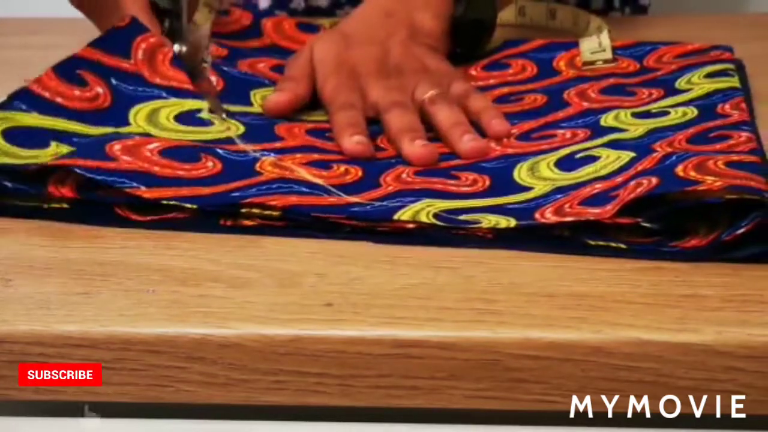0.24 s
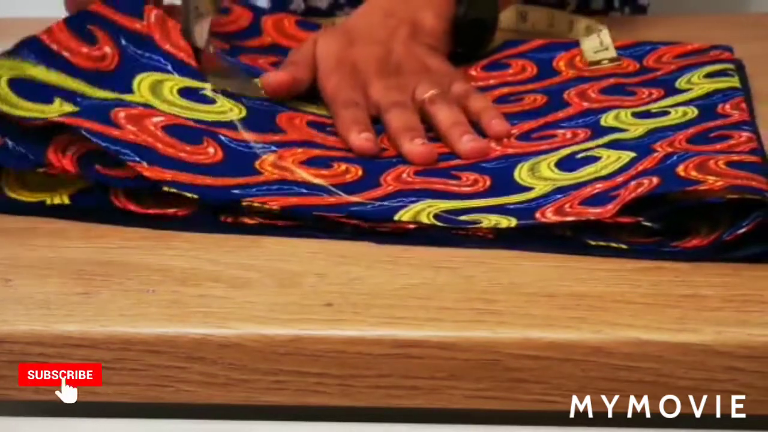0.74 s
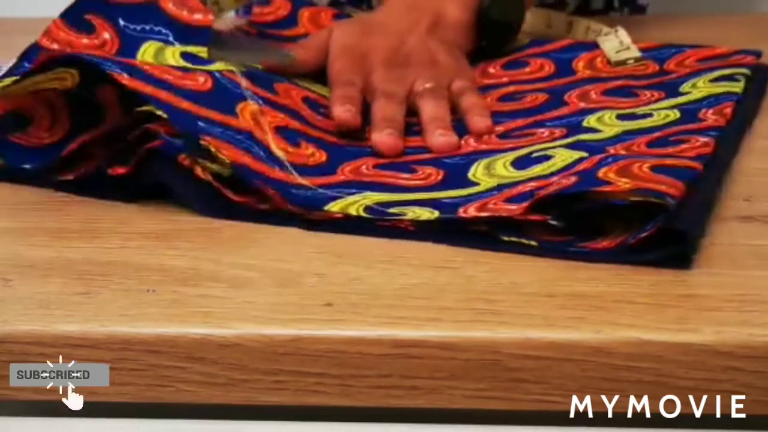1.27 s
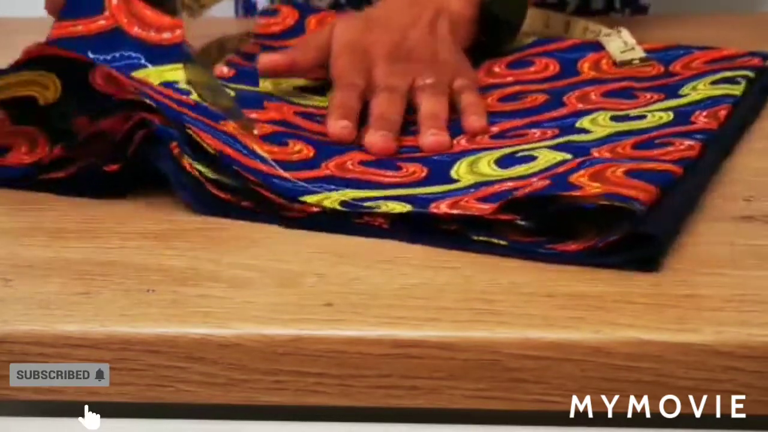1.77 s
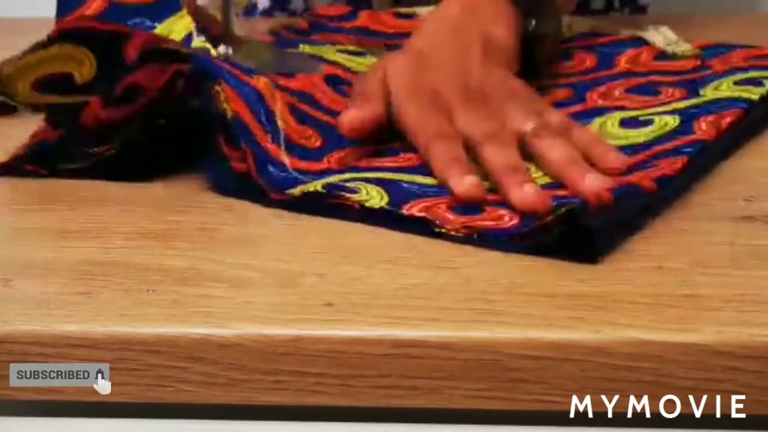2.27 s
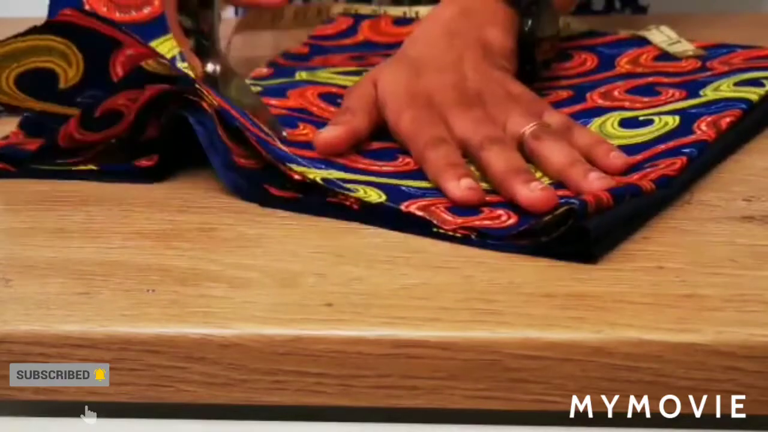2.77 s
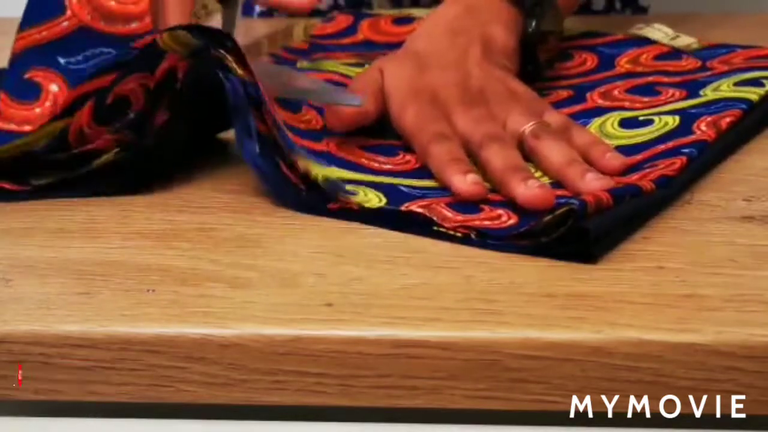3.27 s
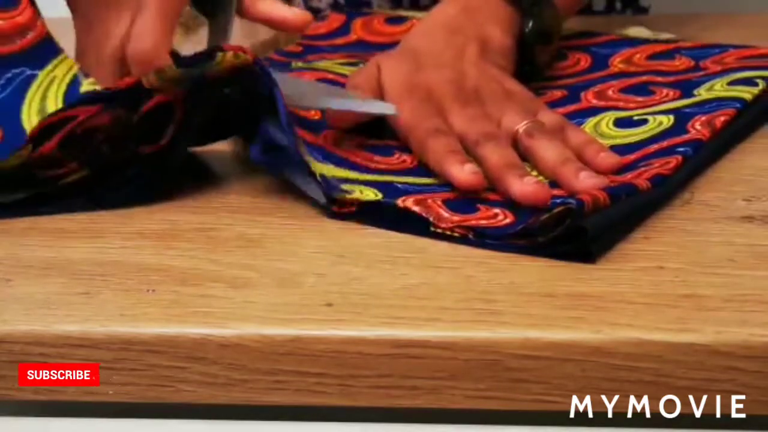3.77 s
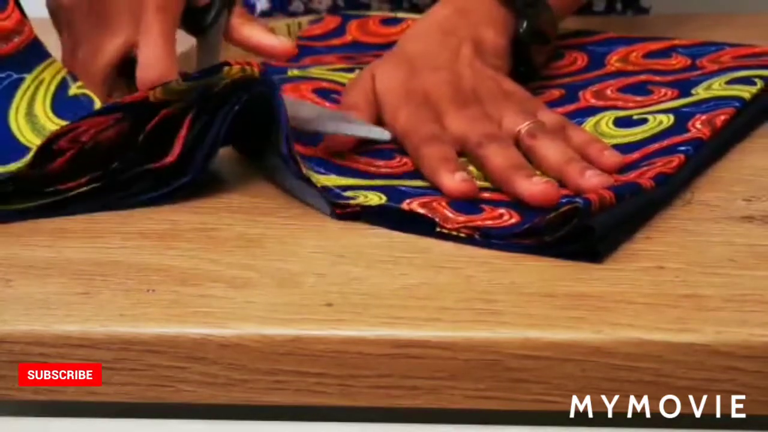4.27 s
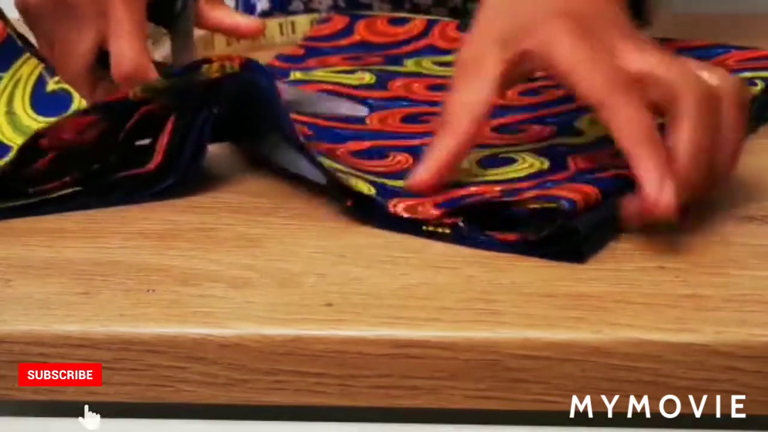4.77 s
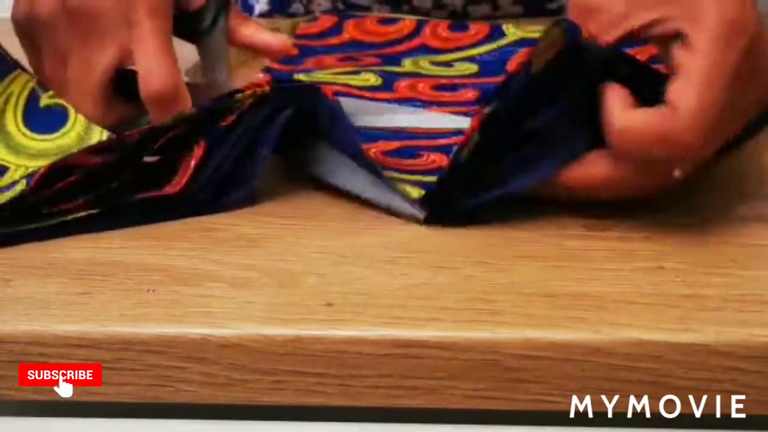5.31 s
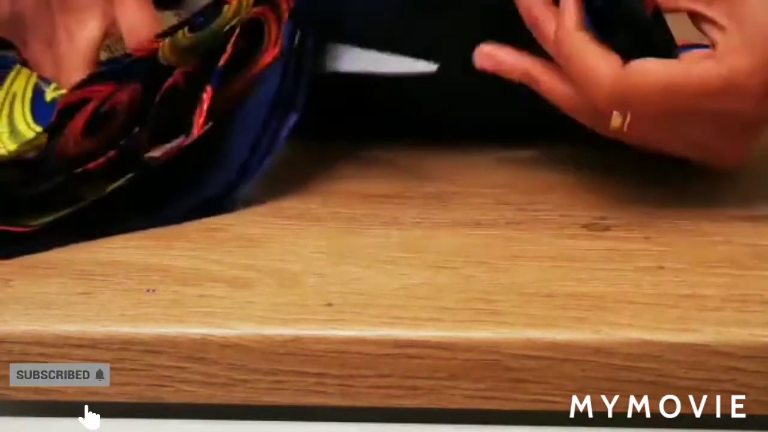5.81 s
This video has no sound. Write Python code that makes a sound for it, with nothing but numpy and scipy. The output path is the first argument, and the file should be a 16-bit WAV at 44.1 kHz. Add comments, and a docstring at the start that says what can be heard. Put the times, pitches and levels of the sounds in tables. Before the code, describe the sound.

Six crisp, gritty scissor cuts through thick fabric in a small room, blades sliding open between, ending in table bumps and cloth shoves.

```python
"""Tailor's shears make six cuts through folded cloth on a wooden table in a small room.
Quiet air, a faint table shudder and faint rubbing run throughout; a knock comes just before the first cut.
Each cut is one squeeze of the hand: snapping threads crunch through the blades and drum the table top.
Between cuts the blades slide open, squeak, click and knock on the wood, and a hand presses and shoves.
After the sixth cut come knocks, shoves, one long slide and a last press, then a short slide and a knock."""
import sys
import numpy as np
from scipy import signal
from scipy.fft import rfft, irfft
from scipy.io import wavfile

SR = 44100
rng = np.random.default_rng(int(sys.argv[2]) if len(sys.argv) > 2 else 0)


def digitize_waveform(pressure):
    """Quantize a signal to 16-bit integers and store it at the path in sys.argv[1].

    Rows of a 2-D input are taken as channels; values are limited to [-1, 1].
    """
    field = np.atleast_2d(pressure).T
    bounded = np.clip(field, -1, 1)
    quanta = np.round(bounded * 32767).astype(np.int16)
    wavfile.write(sys.argv[1], SR, quanta)


N = 266805
TIME = np.arange(N) / SR  # s
TAPS = 8192  # length of the impulse responses and of the short noise bursts, samples

# The six cuts. Each row: start in seconds, squeeze in seconds, let-go in seconds, first bite in dB
# re the hardest squeeze, then relative levels in dB of crunch, cloth rasp, deep table drumming,
# hollow table ring and table shudder, and last the blade resonance in Hz.
CUTS = [ (0.171, 0.11, 0.069, -17.5, -45, -47, -33, -34.5, -45, 1840),
        (0.915, 0.13, 0.084, -17, -45, -51.5, -44, -40, -49, 1760),
        (1.741, 0.13, 0.089, -13, -44.5, -54, -49.5, -40, -50, 1670),
        (2.819, 0.1, 0.096, -9, -47, -55, -47.5, -40, -60, 1757),
        (3.501, 0.11, 0.082, -12, -44, -57, -49, -40.5, -58, 1770),
        (4.597, 0.033, 0.07, -5, -47, -52, -43.5, -46, -48, 1820), ]
# Deep modes of the table top. Each row: frequency in Hz, width in Hz, relative level in dB.
TABLE_DEEP = [(158.8, 9.1, 1.5), (207.6, 18.7, 2), (248, 10, -35), (269.6, 39, 4), (315, 290, -12)]
# Hollow modes of the table top. Each row: frequency in Hz, width in Hz, relative level in dB.
TABLE_HOLLOW = [(390, 83, -27), (448.6, 16, -6), (461.5, 19, -2.5), (496, 32, 5), (580.6, 8.8, -8),
                (636, 9.8, -11.5)]
# Spectrum of scraped cloth. Each row: frequency in Hz, relative level in dB per Hz.
SCRAPE = [(400, -8), (800, 8.5), (1250, 5), (1800, 1.5), (2400, -4), (4500, -8), (9000, -20.5)]


def amp(db):
    """Decibels to gain."""
    return 10 ** (np.asarray(db) / 20)


def unit(x):
    """Scales a response to energy 1."""
    return x / np.sqrt(np.sum(x ** 2) + 1e-20)


def read(points, hz):
    """Reads a table on a log-frequency axis."""
    f, value = np.transpose(points)
    return np.interp(np.log(hz + 1), np.log(f + 1), value)


def add(mix, s, sound):
    """Mixes a sound in at time s."""
    part = mix[max(round(s * SR), 0):][:len(sound)]
    part += sound[:len(part)]


def through(x, response):
    """Passes a sound through an impulse response."""
    return signal.oaconvolve(x, response)[:N]


def colour(spectrum):
    """Causal (minimum-phase) impulse response with the given spectrum and energy 1."""
    hz = abs(np.fft.fftfreq(TAPS, 1 / SR))
    log_gain = np.log(amp(read(spectrum, hz)))
    return unit(np.fft.ifft(np.exp(np.conj(signal.hilbert(log_gain)))).real)


def ring(modes):
    """Impulse response of a set of modes; the wider the mode, the faster it dies."""
    t = np.arange(TAPS) / SR
    total = 0
    for hz, width, db in modes:
        total = total + amp(db) * unit(np.exp(-np.pi * width * t) * np.sin(2 * np.pi * hz * t))
    return unit(total)


def table(modes):
    """The table top answers only around its modes; the cloth cushions everything faster."""
    hz = [row[0] for row in modes]
    band = signal.butter(2, [0.94 * min(hz), 1.6 * max(hz)], "band", fs=SR, output="sos")
    return unit(signal.sosfilt(band, ring(modes)))


def wander(per_s):
    """Random motion of about unit size: straight lines between per_s random knots a second."""
    knots = rng.standard_normal(4096)
    return np.interp(TIME * per_s, np.arange(len(knots)), knots)


def grains(per_s, spread_db, clump_db, clumps_per_s):
    """Tiny snaps of uneven size that come in clumps, rms 1."""
    size = amp(spread_db * np.minimum(rng.exponential(1, N), 3)) * rng.choice([-1, 1], N)
    present = rng.random(N) < per_s / SR
    clumps = amp(clump_db * np.tanh(wander(clumps_per_s)))
    snaps = size * present * clumps
    return snaps / (snaps.std() + 1e-20)


def gate(start, end, attack_s, release_s):
    """Gain 1 from start to end, dying away exponentially on both sides."""
    outside = np.maximum(start - TIME, 0) / attack_s + np.maximum(TIME - end, 0) / release_s
    return np.exp(-np.minimum(outside, 20))


def air():
    """Quiet air of the room: steady coloured noise."""
    # Spectrum of the air. Each row: frequency in Hz, relative level in dB per Hz.
    air_spectrum = [(25, 0), (60, -1), (120, -6), (300, -12), (600, -18), (2000, -24), (2350, -16),
                    (2800, -26), (6000, -33), (11000, -37), (15700, -44)]
    return amp(-69) * through(rng.standard_normal(N), colour(air_spectrum))


def squeeze(s, squeeze_s, let_go_s, bite_db):
    """Force of one cut: the edges bite, the hand squeezes to a rounded peak and lets go."""
    bite_s = 0.01  # the edges take hold this fast
    let_go_db = -28.5  # force after the let-go time, re the hardest squeeze
    peak = s + squeeze_s
    rise = np.clip((peak - TIME) / squeeze_s, 0, 1)
    fall = np.clip((TIME - peak) / let_go_s, 0, 2)
    force_db = bite_db * rise ** 1.97 + let_go_db * fall ** 1.93  # the powers round the top
    return amp(force_db) * gate(s, peak + 2 * let_go_s, bite_s, bite_s)


def press(s):
    """The hand's weight lands quickly on the table, then the shudder dies away."""
    rise_s, fade_db_per_s = 0.0097, 137
    since = np.maximum(TIME - s, 0)
    return np.minimum(since / rise_s, 1) * amp(-fade_db_per_s * np.maximum(since - rise_s, 0))


def rumble():
    """The whole table shudders under the hands as low noise, with every cut and every press."""
    # The hand puts its weight on the table. Each row: start in seconds, relative shudder in dB.
    presses = [(0.585, -43), (1.204, -50.5), (1.55, -57), (4.05, -60.5), (4.67, -50), (5.315, -48)]
    # Spectrum of the shudder. Each row: frequency in Hz, relative level in dB per Hz.
    shudder_spectrum = [(15, 2.5), (26, -3), (38, 0.5), (57, 5.5), (80, -5.5), (110, -4.5), (160, -10),
                        (400, -54)]
    weight = amp(-66.5) * np.ones(N)  # the hands are never quite still
    for s, db in presses:
        weight += amp(db) * press(s)
    for s, squeeze_s, let_go_s, bite_db, *_, shudder_db, _ in CUTS:
        weight += amp(shudder_db) * squeeze(s, squeeze_s, let_go_s, bite_db) ** 0.4
    return amp(-0.5) * through(rng.standard_normal(N) * weight, colour(shudder_spectrum))


def slide(s, length, drift_db):
    """Speed of the opening blades: a brisk start, a steady drift in dB, a stop as the blades part."""
    attack_s, release_s = 0.015, 0.015
    drift = amp(drift_db * np.clip((TIME - s) / length, 0, 1))
    start = np.clip((TIME - s) / attack_s, 0, 1)
    return start * drift * gate(s, s + length, attack_s, release_s)


def shove(s, length):
    """Speed of a shove: one arch that swells in its middle and dies quickly at its ends."""
    ends_db, edge_s = -5.5, 0.028
    off_centre = np.clip(2 * (TIME - s) / length - 1, -1, 1)
    return amp(ends_db * off_centre ** 2) * gate(s, s + length, edge_s, edge_s)


def sliding():
    """Opening blades rub with a fine hiss; slides and shoves scrape the cloth; shoves drag on the wood."""
    # The blades slide open. Each row: start in seconds, length in seconds, relative levels of
    # steel hiss and cloth scrape in dB, change of speed by the end in dB.
    slides = [(0.496, 0.22, -69.5, -61, -2), (1.27, 0.2, -65.5, -68.5, 0), (2.304, 0.16, -59, -47, -5.5),
              (3.149, 0.19, -62, -48, -6), (3.857, 0.18, -56.5, -51, -7.5), (5.094, 0.34, -65.5, -60.5, 1),
              (5.774, 0.068, -70.5, -68, -2.5)]
    # Shears and cloth are shoved over the table. Each row: start in seconds, length in seconds,
    # relative levels of cloth scrape and table ring in dB.
    shoves = [(0.54, 0.14, -53.5, -50), (0.876, 0.073, -54, -48), (1.206, 0.084, -66, -63.5),
              (1.707, 0.062, -64.5, -55.5), (2.026, 0.14, -50.5, -50.5), (2.225, 0.085, -55.5, -50.5),
              (2.315, 0.14, -59, -48.5), (2.69, 0.065, -49, -49.5), (2.978, 0.043, -55, -58),
              (3.153, 0.058, -60.5, -57.5), (3.37, 0.046, -78, -63), (3.796, 0.1, -63, -68.5),
              (4.5, 0.19, -60, -58), (4.928, 0.26, -61.5, -57.5), (5.218, 0.17, -65, -53)]
    # Spectrum of steel rubbing on steel. Each row: frequency in Hz, relative level in dB per Hz.
    hiss_spectrum = [(1500, -16), (2800, -11.5), (4700, 2), (5800, -5), (7200, 7.5), (8000, 5), (8700, -7),
                     (10400, -0.5), (12000, -13), (15700, -18)]
    fine = grains(per_s=7600, spread_db=3.5, clump_db=4.5, clumps_per_s=86)
    coarse = grains(per_s=3100, spread_db=3.5, clump_db=7.5, clumps_per_s=34)
    hiss, scrape, drag = np.zeros((3, N))
    for s, length, hiss_db, scrape_db, drift_db in slides:
        speed = slide(s, length, drift_db)
        hiss += amp(hiss_db) * speed
        scrape += amp(scrape_db) * speed
    for s, length, scrape_db, drag_db in shoves:
        speed = shove(s, length)
        hiss += amp(scrape_db - 19) * speed  # a shove hisses faintly too
        scrape += amp(scrape_db) * speed
        drag += amp(drag_db) * speed
    # a little rubbing stays on: the hands are never quite still
    hiss = fine * (hiss + amp(-81.5))
    scrape = coarse * (scrape + amp(-76))
    steel = amp(-3.5) * through(hiss, colour(hiss_spectrum))
    cloth = amp(-9.5) * through(scrape, colour(SCRAPE))
    wood_response = amp(-2.5) * table(TABLE_HOLLOW) + amp(-8.5) * table(TABLE_DEEP)
    return steel + cloth + through(coarse * drag, wood_response)


def knocks():
    """A soft blow on the table top, then a short noisy shuffle as the shears settle."""
    # Shears and hand bump the table. Each row: start in seconds, relative levels of the deep
    # and the hollow part in dB.
    bumps = [(0.102, -49.5, -52.5), (.171, -46, -64), (0.726, -57.5, -39), (0.787, -48, -58),
             (0.878, -43.5, -60), (0.957, -38, -65), (1.196, -61, -46), (1.517, -61.5, -42.5),
             (1.868, -55, -56), (1.987, -52.5, -63), (2.035, -60, -43.5), (2.092, -75, -40),
             (2.144, -83, -49), (2.242, -50, -53), (2.708, -55, -51), (3.369, -69, -43.5),
             (4.247, -63.5, -67), (4.491, -47, -66), (4.556, -48, -49.5), (4.758, -51.5, -51.5),
             (4.829, -45.5, -47.5), (4.942, -52, -63), (5.03, -48, -69), (5.533, -58, -58.5),
             (5.896, -61.5, -50.5)]
    t = np.arange(TAPS) / SR
    deep, hollow = np.zeros((2, N))
    for s, deep_db, hollow_db in bumps:
        blow = unit(rng.standard_normal(TAPS) * t * np.exp(-t / 0.012))  # the shuffle
        blow[0] += 1  # the blow itself
        add(deep, s, amp(deep_db) * blow)
        add(hollow, s, amp(hollow_db) * blow)
    deep = amp(26.5) * through(deep, table(TABLE_DEEP))
    return deep + amp(20.5) * through(hollow, table(TABLE_HOLLOW))


def edge_travel(x, hop_s, depth):
    """The cutting point runs along the edge, so its echo inside the blade keeps shifting the colour."""
    at = np.arange(N)
    delay = hop_s * SR * np.exp(0.22 * wander(25))  # samples
    echo = np.interp(at - delay, at, x)
    return (x + depth * echo) / np.sqrt(1 + depth ** 2)


def cutting():
    """Threads snap between the edges; each snap rings the blades and, through the lower blade, the table."""
    # Spectrum of the crunch. Each row: frequency in Hz, relative level in dB per Hz.
    crunch_spectrum = [(200, -21), (600, -22), (740, -3.5), (860, 13), (1080, -14.5), (1900, 7),
                       (2300, -4.5), (3300, -1.5), (5000, -5.5), (6000, -11), (6900, -4.5), (8800, -12),
                       (10500, -4.5), (11600, -16), (15700, -24.5)]
    # Modes rung by the snaps: the first two of the table top, the rest of the blades.
    # Each row: frequency in Hz, width in Hz, relative level in dB.
    snap_modes = [(880, 7.4, -0.5), (940, 24, -5.5), (1240, 57, -6.5), (1670, 48, -13.5), (1693, 84, 0.5),
                  (2950, 260, -7), (4980, 320, -0.5), (7780, 98, -6.5)]
    deep_lead_s = 0.0025  # the table starts to drum just before the threads give
    snaps = grains(per_s=2400, spread_db=3.0, clump_db=7.0, clumps_per_s=190)
    crunch, blade, rasp, deep, hollow = np.zeros((5, N))
    for s, *grip, crunch_db, rasp_db, deep_db, hollow_db, _, blade_hz in CUTS:
        threads = snaps * squeeze(s, *grip)
        force = amp(crunch_db) * threads
        crunch += force
        blade += through(force, ring([(blade_hz, 110, 0)]))
        rasp += amp(rasp_db) * threads
        deep += amp(deep_db) * snaps * squeeze(s - deep_lead_s, *grip)
        hollow += amp(hollow_db) * threads
    crunch = edge_travel(crunch, hop_s=0.0007, depth=0.4)
    snapping = amp(-5.5) * through(crunch, colour(crunch_spectrum)) + amp(-5.5) * blade
    snapping += amp(-7.0) * through(crunch, ring(snap_modes))
    cloth = through(rasp, colour(SCRAPE))
    wood = through(deep, table(TABLE_DEEP)) + through(hollow, table(TABLE_HOLLOW))
    return snapping + cloth + amp(-0.5) * wood


def squeaks():
    """Brief stick-slip of the bare edges excites their high modes."""
    # The edges squeak against each other. Each row: start in seconds, relative level in dB,
    # length in seconds.
    slips = [(0.24, -57, 0.009), (2.892, -53, 0.014), (2.928, -47, 0.009), (4.431, -64, 0.016),
             (4.478, -53, 0.016), (4.596, -30.5, 0.0054)]
    # High modes of the edges. Each row: frequency in Hz, width in Hz, relative level in dB.
    edge_modes = [(6800, 370, -11), (7750, 190, -1.5), (9900, 480, -14)]
    slip = np.zeros(N)
    for s, db, length in slips:
        swell = signal.windows.hann(max(round(length * SR), 8))
        add(slip, s, amp(db) * swell * rng.standard_normal(len(swell)))
    return through(slip, ring(edge_modes))


def clicks():
    """Blades and handles meet in a chatter a few milliseconds long, then buzz briefly."""
    # Steel meets steel. Each row: start in seconds, relative levels of the middle and the
    # bright part in dB.
    meetings = [(0.7308, -48, -60.5), (1.5131, -59.5, -75), (1.767, -50, -67), (2.308, -43, -57),
                (3.055, -51.5, -75), (3.144, -75, -71), (3.3673, -49.5, -59.5), (3.7664, -58.5, -61),
                (4.013, -57.5, -78), (4.132, -47.5, -43), (4.503, -54.5, -77), (4.5544, -48.5, -51.5),
                (4.599, -38, -45)]
    # Spectra of the middle and the bright part. Each row: frequency in Hz, relative level in dB per Hz.
    middle_spectrum = [(300, -36), (800, 9.5), (1800, 10), (2600, 5.5), (4500, 7.5), (7000, -3.5),
                       (12000, -26)]
    bright_spectrum = [(3000, -18), (4200, -12), (6000, -36), (7600, 22.5), (9000, 16), (11000, 19.5),
                       (13000, -6), (15700, 4)]
    t = np.arange(TAPS) / SR
    decay = np.exp(-t / 0.0024) + amp(-19.0) * np.exp(-t / 0.016)  # chatter, then the faint buzz
    shape = (1 - np.exp(-t / 0.0012)) * decay
    middle, bright = np.zeros((2, N))
    for s, middle_db, bright_db in meetings:
        chatter = unit(rng.standard_normal(TAPS) * shape)
        add(middle, s, amp(middle_db) * chatter)
        add(bright, s, amp(bright_db) * chatter)
    middle = through(middle, colour(middle_spectrum))
    return amp(21.0) * (middle + through(bright, colour(bright_spectrum)))


def reflections():
    """Dense reflections of a small room from 4 ms on, each band dying at its own rate."""
    # Reverberation of the room. Each row: frequency in Hz, time to fall by 60 dB in seconds.
    decay_times = [(150, 0.37), (1000, 0.26), (3000, 0.26), (8000, 0.22), (15000, 0.26)]
    # Strength of the echo. Each row: frequency in Hz, echo level in dB re the direct sound.
    echo_levels = [(200, -12.5), (600, -5.5), (1500, 0), (10000, -4.5)]
    t = np.arange(SR // 2) / SR
    taps = rng.standard_normal(len(t)) * (t > 0.004)
    hz, at, bands = signal.stft(taps, SR, nperseg=256)
    t60 = read(decay_times, hz)[:, None]
    tail = unit(signal.istft(bands * amp(-60 * at / t60), SR, nperseg=256)[1])
    tail_hz = np.fft.rfftfreq(len(tail), 1 / SR)
    tail = irfft(rfft(tail) * amp(read(echo_levels, tail_hz)))
    return tail[:len(tail) * 3 // 4]


def room(x, count=3):
    """Fixed random patterns of reflections blend in a steady cycle, evening out the room's colour."""
    phase = TIME / 0.701 + np.arange(count)[:, None] / count  # half turns, one per 0.701 s
    shares = np.sqrt(2 / count) * np.cos(np.pi * phase)  # their summed power stays 1
    return sum(through(x * share, reflections()) for share in shares)


def scene():
    """All the work at the table, its echo and the quiet air of the room."""
    work = rumble() + sliding() + knocks() + cutting() + squeaks() + clicks()
    return (work + room(work) + air())[None]


def record(dry):
    """The recorder's band limit: a steep low-pass at 15.8 kHz."""
    low_pass = signal.firwin(511, 15800, window=("kaiser", 9), fs=SR)
    return signal.oaconvolve(dry, low_pass[None], "same")


dry = scene()
out = record(dry)
digitize_waveform(out)
```